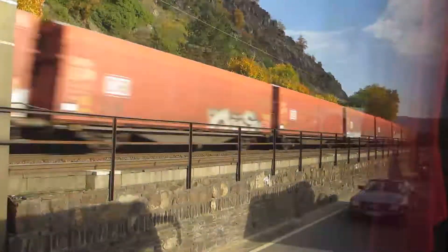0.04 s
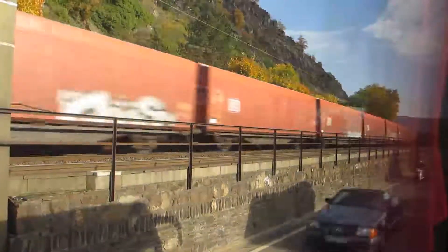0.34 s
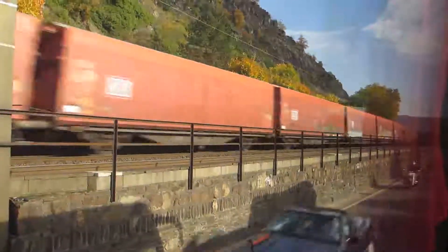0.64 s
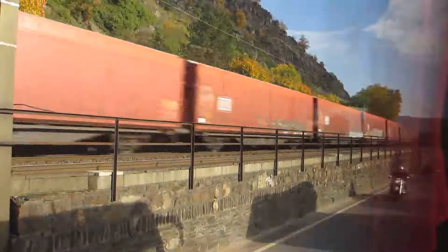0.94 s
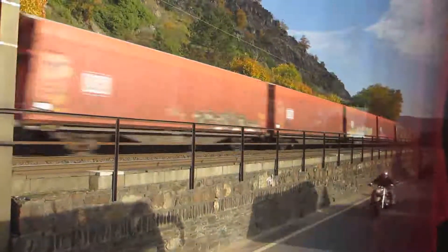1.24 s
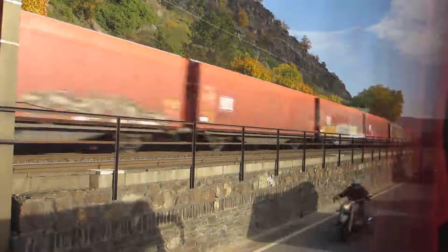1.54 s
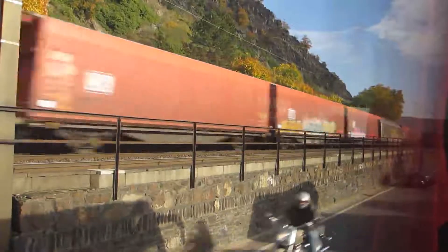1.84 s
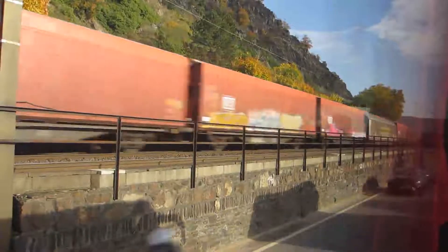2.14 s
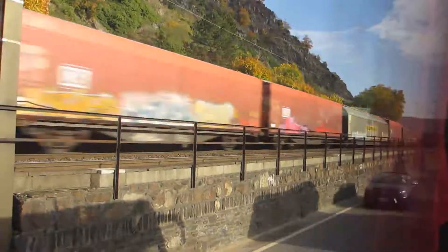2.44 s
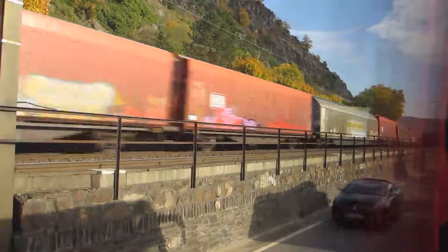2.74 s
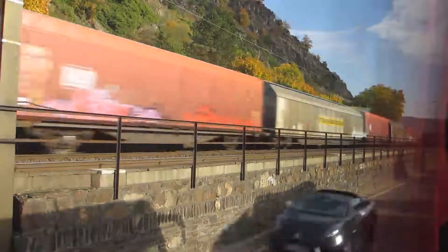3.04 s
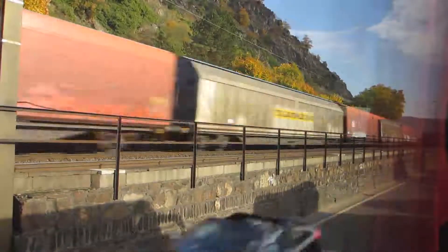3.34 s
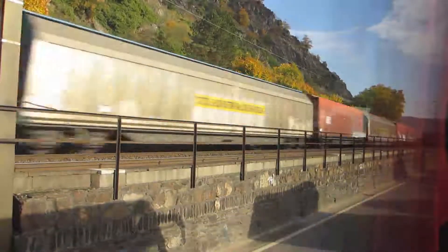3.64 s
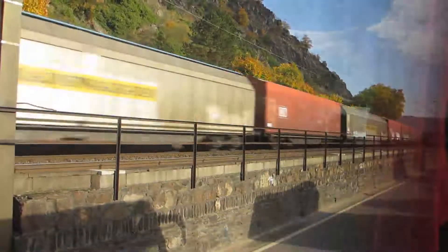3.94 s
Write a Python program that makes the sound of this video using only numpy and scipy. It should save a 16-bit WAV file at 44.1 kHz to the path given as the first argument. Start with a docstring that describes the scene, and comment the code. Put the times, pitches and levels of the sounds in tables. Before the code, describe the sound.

Freight wagons rumble and roar past, heard from an idling vehicle beside passing road traffic.

```python
"""Freight train from an idling vehicle.

A freight train rolls past on an embankment, heard through the window of a standing vehicle whose
engine throbs. Wagons rumble, boom and knock; wheels and rails roar, ring and squeak. Cars and a
motorbike drone by on the road below. Faint hiss and ticks on top; bass much stronger on the right."""
import sys
import numpy as np
from scipy import signal
from scipy.fft import rfft, irfft
from scipy.io import wavfile

SR = 44100
rng = np.random.default_rng(int(sys.argv[2]) if len(sys.argv) > 2 else 0)


def generate_wav(sig):
    """Save sig (samples, or channels by samples) to the path in sys.argv[1] as 16-bit PCM at SR."""
    pcm = np.round(np.clip(np.atleast_2d(sig).T, -1, 1) * 32767).astype(np.int16)
    wavfile.write(sys.argv[1], SR, pcm)


N = 176400
TIME_S, FREQ_HZ = np.arange(N) / SR, np.arange(N // 2 + 1) * SR / N

# Table levels are relative; trims and panning follow.
HISS_SPECTRUM = [(2000, -13), (4500, 1.5), (6300, 1), (8300, -2), (9600, -1), (10800, 1), (12500, -5.5),
                 (15500, -14)]  # fine hiss: freq_hz, density_db
HISS_ENVELOPE = [(0, -58.5), (.7, -60.5), (.95, -59), (1.25, -62), (1.4, -56.5), (1.62, -59.5),
                 (1.91, -59.5), (1.96, -56), (2.03, -60.5), (2.16, -62.5), (3.42, -62), (3.52, -60),
                 (3.65, -62.5), (4, -58.5)]  # fine hiss: time_s, level_db
LIGHT_TICKS = [(1.422, -51), (2.592, -55)]  # ticks in the hiss: start_s, level_db
ENGINE_ENVELOPE = [(0, -25), (.9, -22.5), (1.6, -27.5), (2.3, -28), (2.8, -24.5), (3.3, -27), (4, -22.5)]  # idling engine: time_s, level_db
ENGINE_HARMONICS = [0, -15, -16]  # firing harmonics 1-3: level_db
# passing engines, tyres, wagons: start_s, length_s, start_hz, end_hz, level_db, rough_share
PASSING_DRONES = [(.16, .3, 385, 370, -35, .9), (.42, .4, 163, 159, -31, .3), (.88, .36, 80, 78, -31, .3),
                  (1.1, .36, 119, 126, -29.5, .3), (1.24, .28, 325, 335, -32, .8),
                  (1.36, .32, 82, 80, -24.5, .08), (1.36, .28, 170, 174, -30, .3),
                  (1.54, 1.36, 296, 304, -31, .35), (1.59, .24, 350, 343, -34, .3),
                  (1.72, .42, 79, 76, -27.5, .3), (1.85, .35, 124, 120, -28.5, .3),
                  (1.91, .22, 472, 474, -35, .1), (1.92, .22, 335, 338, -33, .7),
                  (1.93, .24, 284, 284, -29.5, .2), (2.28, .36, 280, 278, -33.5, .5),
                  (2.27, .27, 477, 472, -37, .3), (2.45, .46, 70, 80, -31, .7),
                  (2.86, .4, 99.5, 100.5, -25.4, .12), (3.38, .2, 470, 465, -36.5, .8)]
WHEEL_SQUEAKS = [(.22, .11, 9920, 320, -63), (0, 2.1, 1405, 55, -45.5), (.53, .55, 3490, 70, -65),
                 (.77, .13, 960, 50, -39), (.85, .08, 11300, 280, -65.5), (.96, .045, 10750, 300, -67),
                 (1.44, .06, 1580, 300, -38.5), (1.49, .05, 10950, 400, -66), (1.61, .04, 11400, 400, -66),
                 (1.625, .025, 13900, 700, -66), (1.846, .05, 11250, 380, -62.5),
                 (1.915, .08, 11200, 2200, -63.5), (2.24, .18, 10600, 450, -70),
                 (2.55, .32, 4100, 1300, -64), (2.71, .14, 3635, 45, -57.5), (3.0, 1.0, 3620, 40, -66),
                 (3.483, .055, 8570, 320, -64), (3.495, .05, 10980, 400, -63.5),
                 (3.58, .07, 4150, 900, -58.5), (3.76, .13, 9900, 280, -64.5)]  # rubbing wheels: start_s, length_s, pitch_hz, width_hz, level_db
GEAR_KNOCKS = [(1.214, -21), (3.588, -26)]  # running-gear blows: start_s, level_db
KNOCK_SPECTRUM = [(200, -9), (500, 3), (1000, -3.5), (1600, -13), (3000, -28), (8000, -60)]  # running-gear blows: freq_hz, density_db
SINGING_MODES = [(1340, 75, -45), (1490, 110, -53)]  # singing wheel: pitch_hz, width_hz, level_db
SINGING_ENVELOPE = [(0, 0), (.85, -1), (1.45, -2), (2.25, -8), (2.48, 1), (2.66, -1), (2.75, 4),
                    (2.85, 2.5), (2.96, 8), (3.06, -1), (3.33, 0), (3.6, -5), (4, -7)]  # its swell in passing: time_s, level_db
RUMBLE_SPECTRUM = [(20, -11), (40, -6.5), (50, -5), (62, -3.5), (80, -4), (125, 0.5), (165, -9.5),
                   (240, -22), (380, -32), (1500, -100)]  # deep wagon rumble: freq_hz, density_db
RUMBLE_ENVELOPE = [(0, -25), (.8, -26.5), (1.1, -24.5), (1.5, -24), (1.7, -27.5), (2.0, -22.5), (2.35, -26),
                   (2.55, -23), (2.75, -27), (2.95, -23), (3.35, -26), (3.55, -29.5), (3.6, -22.5),
                   (3.82, -26.5), (4, -21.5)]  # deep wagon rumble: time_s, level_db
BOOM_SPECTRUM = [(70, -9.5), (125, -7), (160, -1.5), (200, -4), (250, -4.5), (335, -9.5), (385, -17),
                 (1500, -100)]  # hollow boom of wagons and traffic: freq_hz, density_db
BOOM_ENVELOPE = [(0, -30), (.3, -28.5), (.45, -27), (.85, -28), (1.08, -24), (1.25, -28.5), (1.45, -24.5),
                 (1.7, -28.5), (2.05, -27.5), (2.4, -26.5), (2.7, -28.5), (2.95, -28), (3.18, -31),
                 (3.45, -28), (4, -30.5)]  # hollow boom: time_s, level_db
ROAR_SPECTRUM = [(100, -30), (330, 0), (480, 1), (560, -2), (800, -5.5), (1000, -7), (1170, -11.5),
                 (1500, -10.5), (2100, -17.5), (2800, -26.5), (3500, -29.5), (4400, -38), (7000, -60),
                 (15000, -80)]  # wheels on rails: freq_hz, density_db
ROAR_ENVELOPE = [(0, -30), (.35, -29.7), (.65, -30.8), (1.05, -30.4), (1.3, -31.3), (1.45, -30.8),
                 (1.7, -31.6), (2.0, -31.3), (2.2, -32.5), (2.45, -31.7), (2.9, -31.7), (3.2, -32.6),
                 (3.55, -31.7), (4, -32)]  # wheels on rails: time_s, level_db
RING_MODES = [(297, 36, -36), (470, 45, -42), (640, 50, -47), (965, 90, -46), (1520, 110, -51),
              (2130, 90, -55), (1868, 14, -55.5), (3615, 45, -72)]  # wheel and wagon-body resonances: pitch_hz, width_hz, level_db
SIDE_SPECTRUM = [(30, -9), (60, -9), (200, -14.5), (500, -25), (2000, -15), (3000, -9.5), (4500, -21),
                 (6300, -7), (8000, -10), (10000, -1)]  # diffuse sound, side over mid: freq_hz, gain_db
LEFT_BALANCE = [(27, -8), (45, -29), (65, -15), (130, -19), (220, -15.5), (340, -12), (520, -8.5),
                (810, -6.5), (1240, -5), (1900, -2.5), (3400, -3.5), (4600, 0), (8000, 0), (11000, -6),
                (15000, -1)]  # left ear over right: freq_hz, gain_db
LEFT_PHASE = [(27, 0.19), (60, -0.55), (110, 0.42), (260, 0.76), (500, 1), (1100, 0.57), (3000, 0.49),
              (5000, .02)]  # left ear ahead of right: freq_hz, lead_rad


def from_db(db):
    """Decibels to gain."""
    return 10 ** (np.asarray(db) / 20)


def unit_rms(x):
    """Scale to rms 1."""
    return x / np.sqrt(np.mean(x ** 2))


def over_time(rows):
    """Interpolate (time_s, value) rows linearly."""
    return np.interp(TIME_S, *np.array(rows).T)


def over_freq(rows):
    """Interpolate (freq_hz, value) rows on a log-frequency axis."""
    freq_hz, value = np.array(rows).T
    return np.interp(np.log(FREQ_HZ + 1), np.log(freq_hz), value)


def drift(cutoff_hz):
    """Slow random motion: mean 0, rms 1."""
    lowpass = np.exp(-(FREQ_HZ / cutoff_hz) ** 2) * (FREQ_HZ > 0)
    return unit_rms(irfft(rfft(rng.standard_normal(N)) * lowpass, N))


def stereo_noise(bin_gain):
    """Coloured noise, mid at rms 1; the ears differ most in the high treble."""
    mid_bins, side_bins = rfft(rng.standard_normal((2, N))) * bin_gain
    mid = irfft(mid_bins, N)
    side = irfft(side_bins * from_db(over_freq(SIDE_SPECTRUM)), N)
    return np.array([mid + side, mid - side]) / np.std(mid)


def shaped_noise(spectrum):
    """Stereo noise following (freq_hz, density_db) rows."""
    return stereo_noise(from_db(over_freq(spectrum)))


def band_noise(centre_hz, width_hz):
    """Stereo noise through one steep resonance."""
    return stereo_noise(1 / (1 + 2 * ((FREQ_HZ - centre_hz) / width_hz) ** 2))


def hiss_and_ticks(trim_db=0.5, flicker_db=0.77, tick_decay_s=0.004):
    """Thin flickering hiss with two light ticks."""
    hiss = shaped_noise(HISS_SPECTRUM)
    hiss *= from_db(over_time(HISS_ENVELOPE) + trim_db + flicker_db * drift(25))
    tick_gain = np.zeros(N)
    for start_s, level_db in LIGHT_TICKS:
        age_s = TIME_S - start_s
        tick_gain += from_db(level_db) * (age_s >= 0) * np.exp(-np.abs(age_s) / tick_decay_s)
    return hiss + tick_gain * band_noise(centre_hz=11000, width_hz=5000)


def idling_engine(firing_hz=27.58, wander_ratio=0.005, flutter_db=1.4):
    """The standing vehicle's engine throbs at a slightly unsteady firing rate."""
    pitch_hz = firing_hz * (1 + wander_ratio * drift(2))
    phase_rad = 2 * np.pi * np.cumsum(pitch_hz) / SR
    throb = sum(from_db(level_db) * np.sin(order * phase_rad)
                for order, level_db in enumerate(ENGINE_HARMONICS, 1))
    return unit_rms(throb) * from_db(over_time(ENGINE_ENVELOPE) - flutter_db * drift(8))


def passing_traffic(trim_db=-0.75, fade_s=0.082, wander_ratio=0.0029, smear_hz=25.5):
    """Drones swell and fade as vehicles pass; the rough share is smeared around each pitch."""
    drones = np.zeros(N)
    for start_s, length_s, start_hz, end_hz, level_db, rough_share in PASSING_DRONES:
        end_s = start_s + length_s
        glide_hz = np.interp(TIME_S, [start_s, end_s], [start_hz, end_hz])
        pitch_hz = glide_hz * (1 + wander_ratio * drift(7.2))
        carrier = np.exp(2j * np.pi * np.cumsum(pitch_hz) / SR)
        smear = drift(smear_hz) + 1j * drift(smear_hz)
        grain = np.sqrt(2 * (1 - rough_share)) + np.sqrt(rough_share) * smear
        fade = np.clip(np.minimum(TIME_S - start_s, end_s - TIME_S) / fade_s, 0, 1)
        drones += np.imag(grain * carrier) * fade * from_db(level_db + trim_db)
    return drones


def wheel_squeaks():
    """Rubbing wheels sing in narrow bands or scrape in wide ones."""
    squeaks = np.zeros((2, N))
    for start_s, length_s, pitch_hz, width_hz, level_db in WHEEL_SQUEAKS:
        swell = np.sin(np.pi * np.clip((TIME_S - start_s) / length_s, 0, 1))
        squeaks += band_noise(pitch_hz, width_hz) * from_db(level_db) * swell
    return squeaks


def gear_knocks(rise_s=0.003, decay_s=0.014):
    """The running gear knocks: short, dull noise bursts."""
    blow_gain = np.zeros(N)
    for start_s, level_db in GEAR_KNOCKS:
        age_s = np.maximum(TIME_S - start_s, 0)
        blow_gain += from_db(level_db) * np.tanh(age_s / rise_s) ** 2 * np.exp(-age_s / decay_s)
    return blow_gain * shaped_noise(KNOCK_SPECTRUM)


def singing_wheel():
    """One wheel rings out above the roar as it nears."""
    ring = sum(band_noise(pitch_hz, width_hz) * from_db(level_db)
               for pitch_hz, width_hz, level_db in SINGING_MODES)
    return ring * from_db(over_time(SINGING_ENVELOPE))


def wagon_rumble(rumble_trim_db=2.2, boom_trim_db=1.8, shake_db=0.14):
    """Wagons shaken by the track: deep rumble under a hollow boom."""
    rumble = shaped_noise(RUMBLE_SPECTRUM)
    rumble *= from_db(over_time(RUMBLE_ENVELOPE) + rumble_trim_db - shake_db * drift(6))
    boom = shaped_noise(BOOM_SPECTRUM) * from_db(over_time(BOOM_ENVELOPE) + boom_trim_db)
    return rumble + boom


def rolling_roar(roar_trim_db=0.54, flicker_db=0.73, ring_swell_db=0.65):
    """Wheels roar on the rails; wheel and body resonances follow the roar, each swelling at random."""
    rolling_db = over_time(ROAR_ENVELOPE) + flicker_db * drift(29)
    roar = shaped_noise(ROAR_SPECTRUM) * from_db(rolling_db + roar_trim_db)
    rings = sum(band_noise(pitch_hz, width_hz) * from_db(level_db + ring_swell_db * drift(3.6))
                for pitch_hz, width_hz, level_db in RING_MODES)
    return roar + rings * from_db(rolling_db - rolling_db.mean())


def scene():
    """All sources; bass leans right, phase shifted between the ears."""
    train = wagon_rumble() + rolling_roar() + singing_wheel() + gear_knocks()
    mix = train + idling_engine() + passing_traffic() + wheel_squeaks() + hiss_and_ticks()
    left = from_db(over_freq(LEFT_BALANCE)) * np.exp(1j * over_freq(LEFT_PHASE))
    right = np.ones_like(left)
    pan = np.array([left, right]) * 2 / np.abs(left + right)  # mid level preserved
    return irfft(rfft(mix) * pan, N)


def record(dry, fade_s=0.003, cutoff_hz=15500):
    """Click-free edge fades, then a steep low-pass."""
    fade = np.minimum(np.minimum(TIME_S, TIME_S[-1] - TIME_S) / fade_s, 1)
    lowpass = signal.ellip(8, rp=0.2, rs=70, Wn=cutoff_hz, fs=SR, output="sos")
    return signal.sosfilt(lowpass, dry * fade)


dry = scene()
out = record(dry)
generate_wav(out)
```